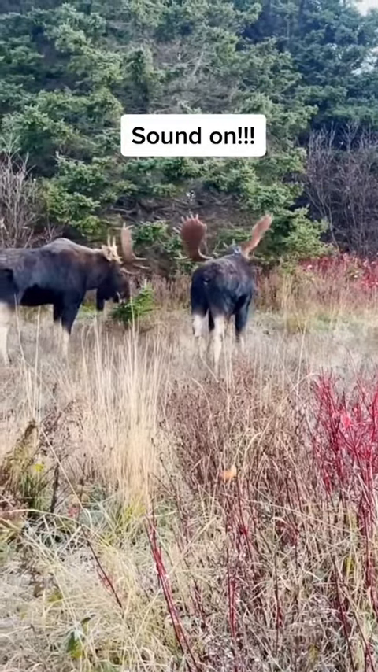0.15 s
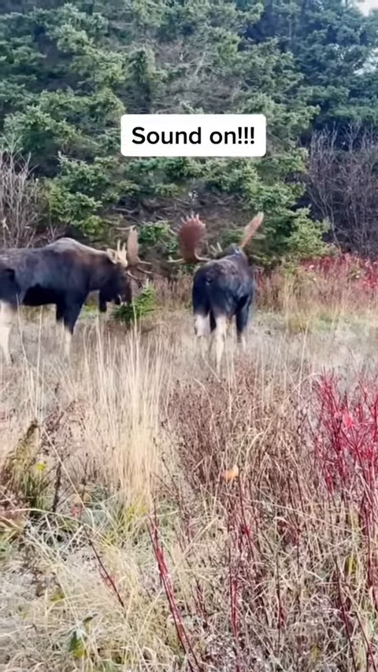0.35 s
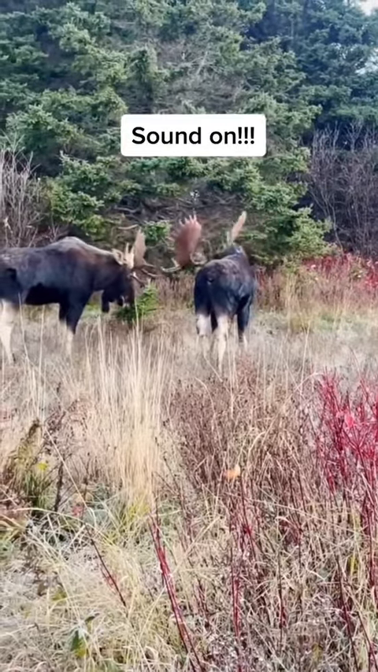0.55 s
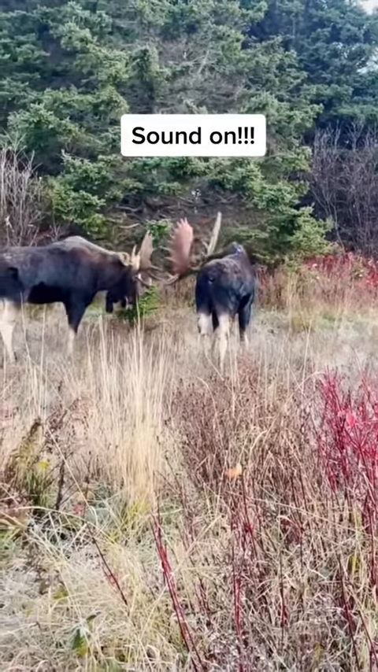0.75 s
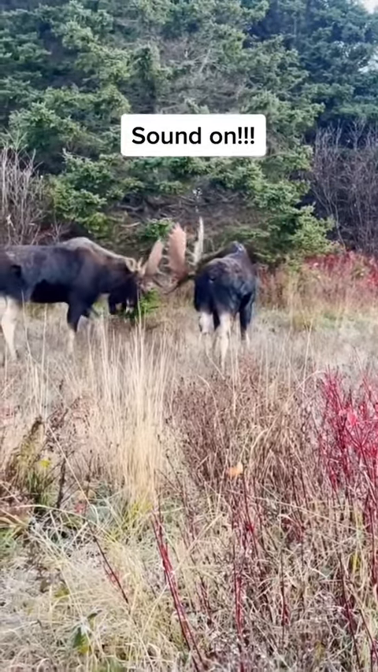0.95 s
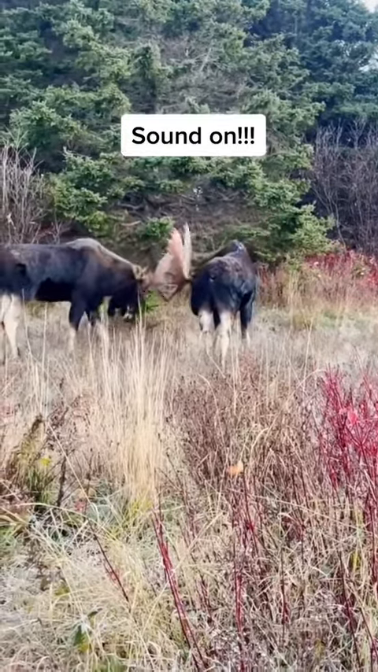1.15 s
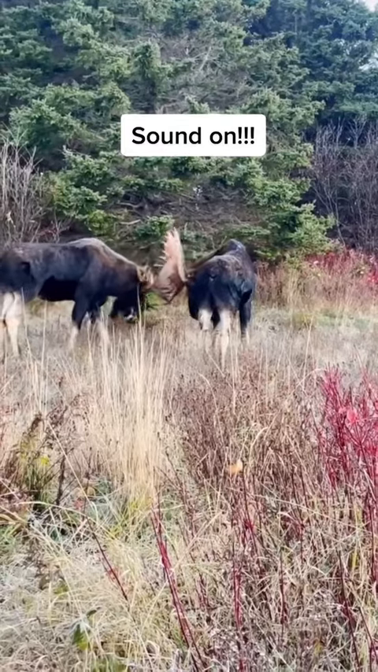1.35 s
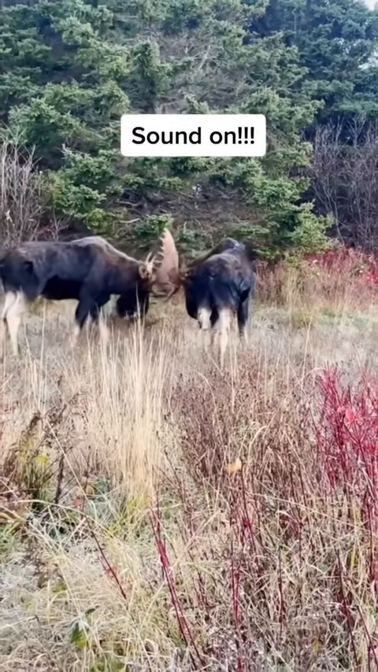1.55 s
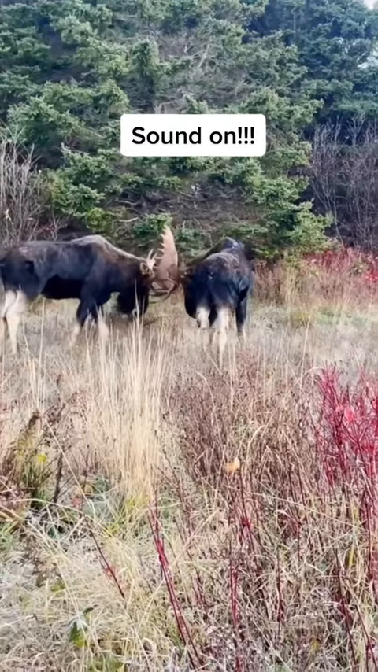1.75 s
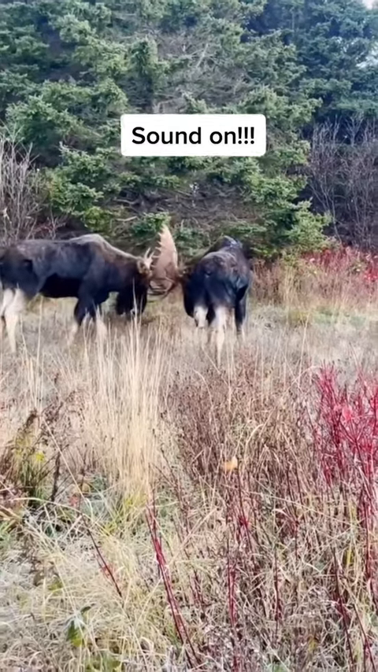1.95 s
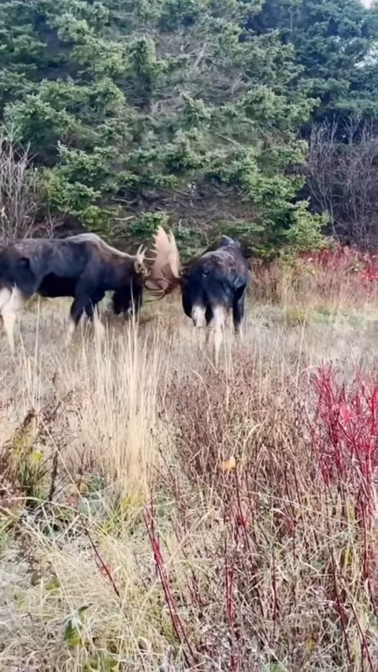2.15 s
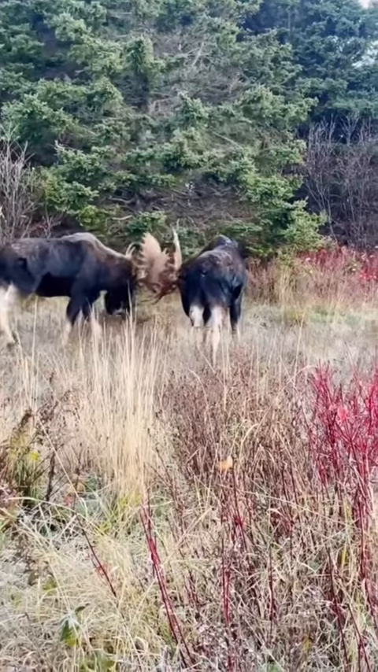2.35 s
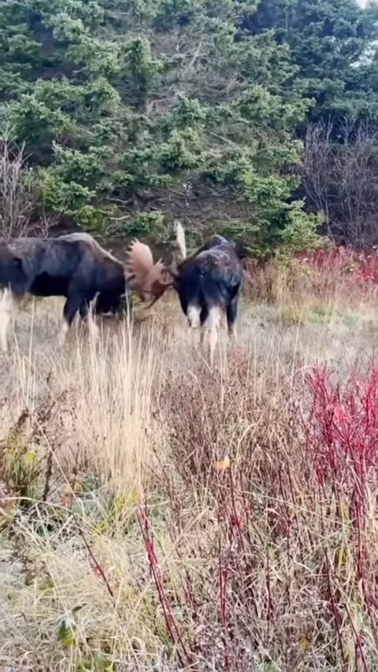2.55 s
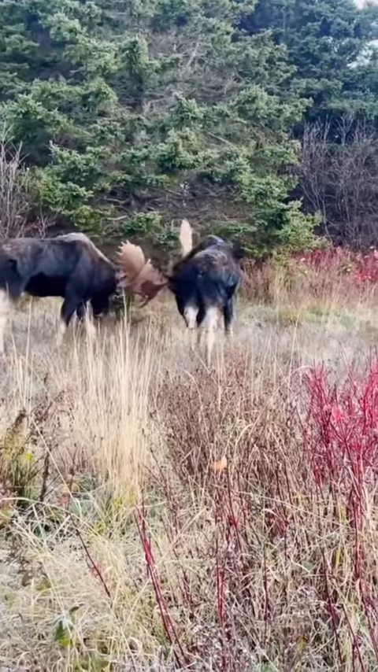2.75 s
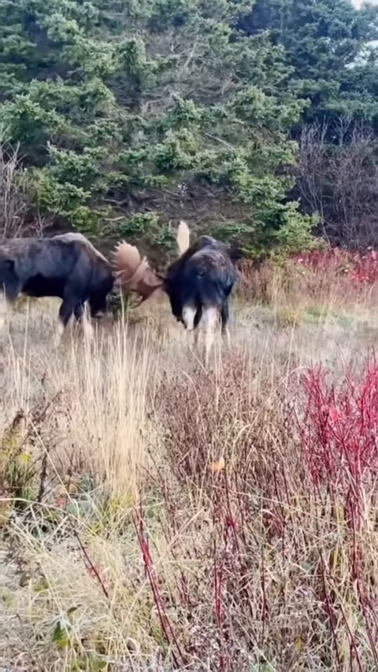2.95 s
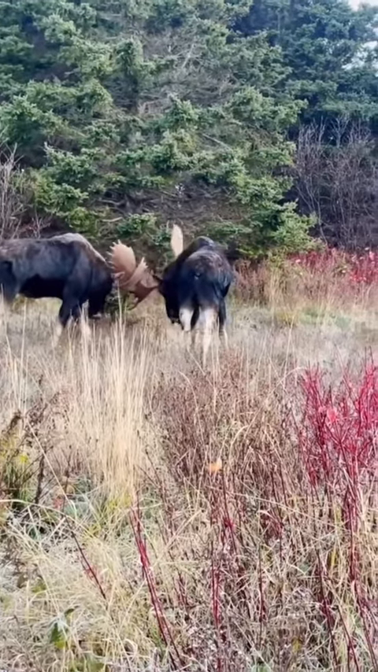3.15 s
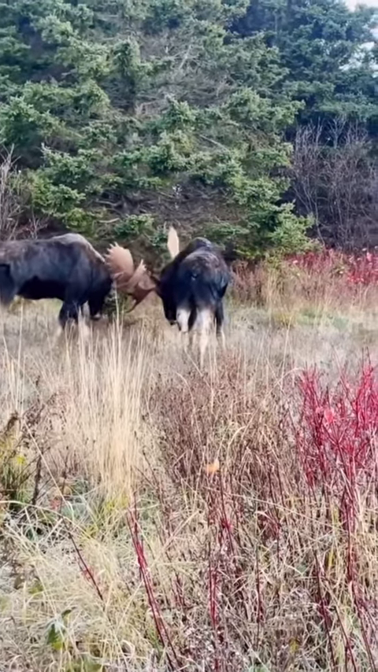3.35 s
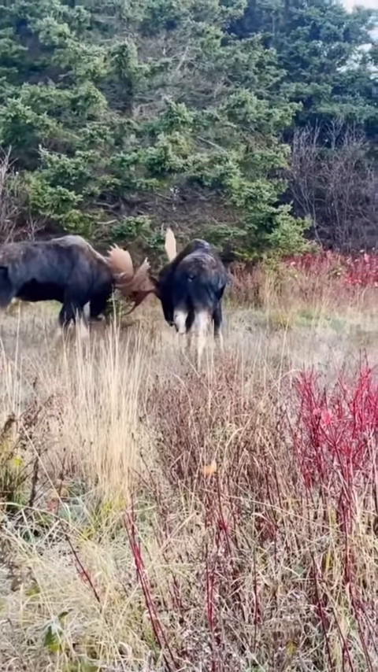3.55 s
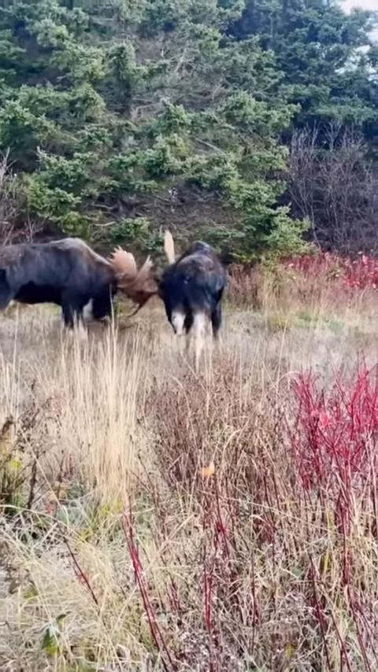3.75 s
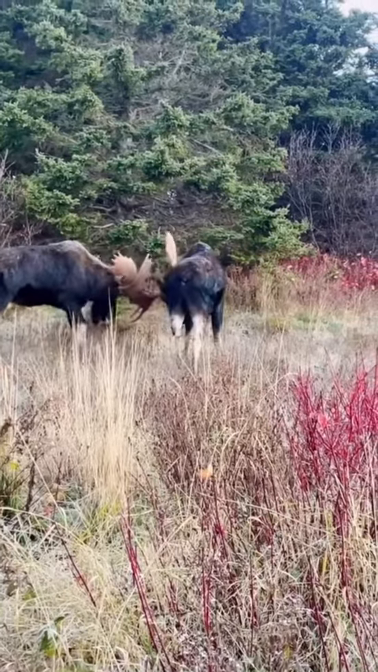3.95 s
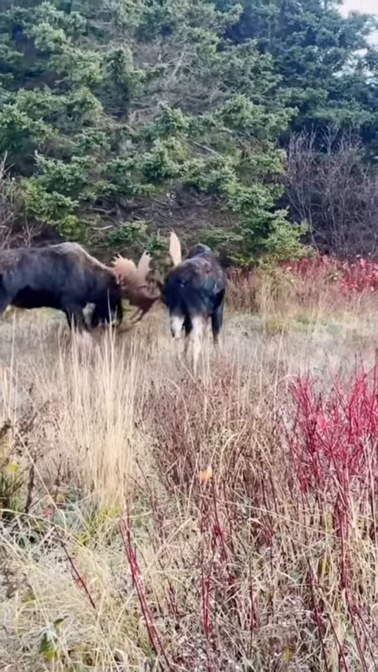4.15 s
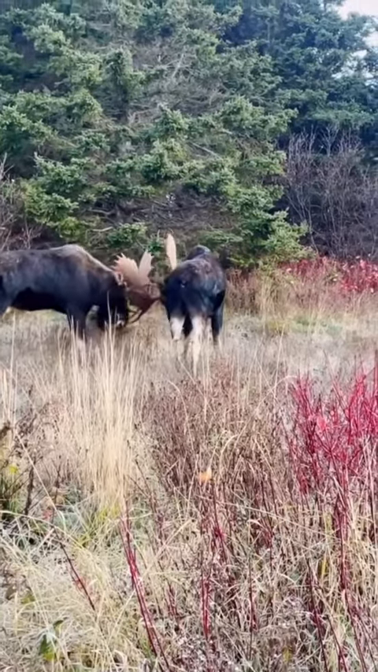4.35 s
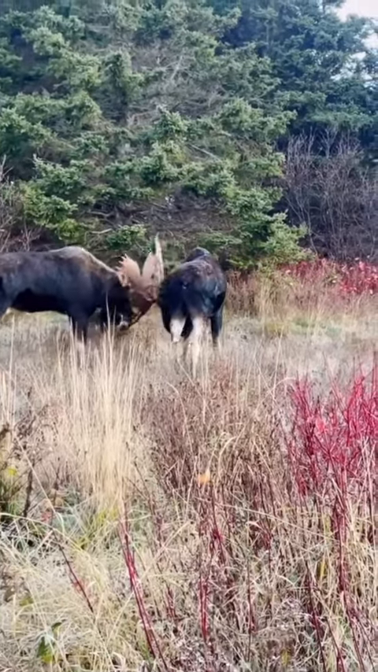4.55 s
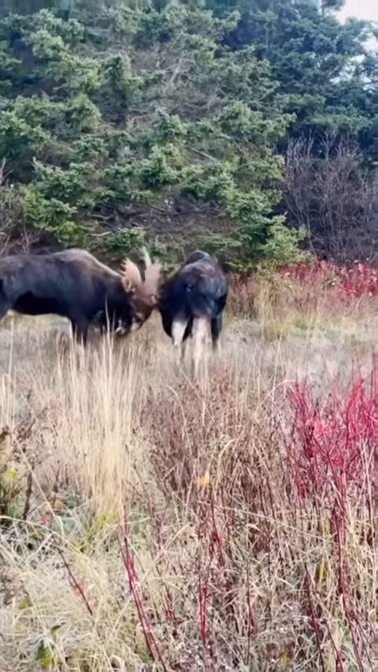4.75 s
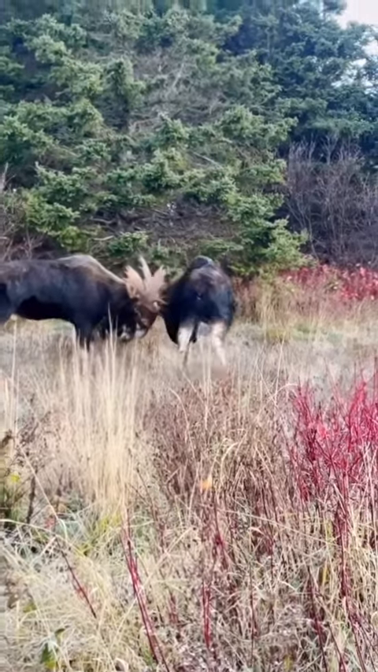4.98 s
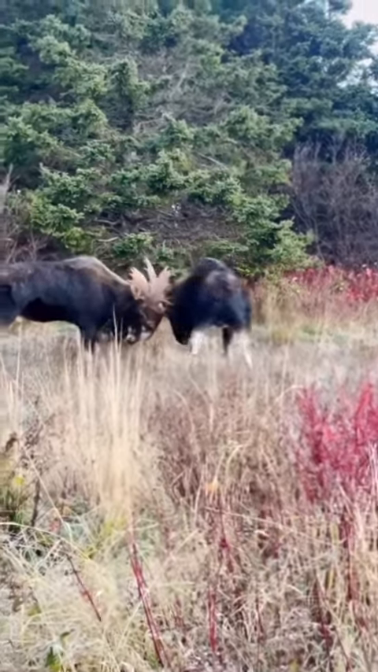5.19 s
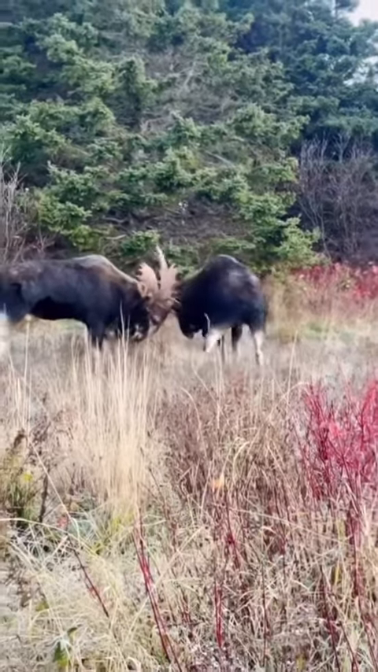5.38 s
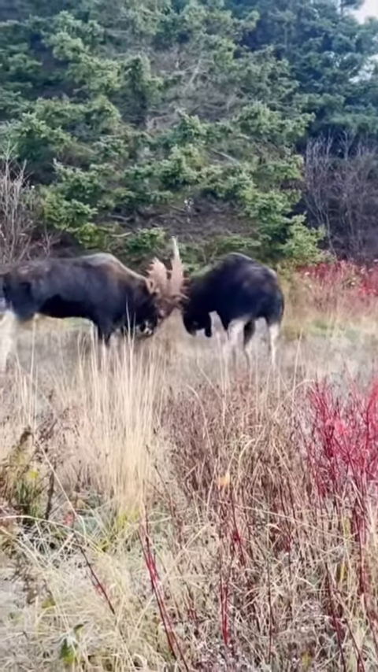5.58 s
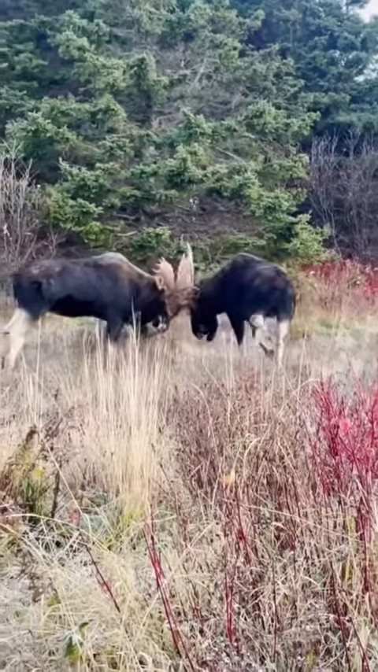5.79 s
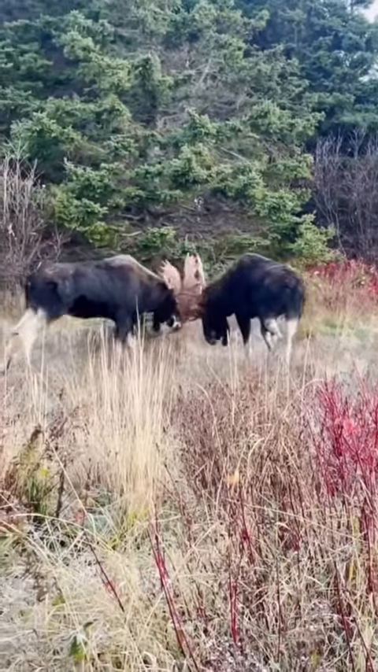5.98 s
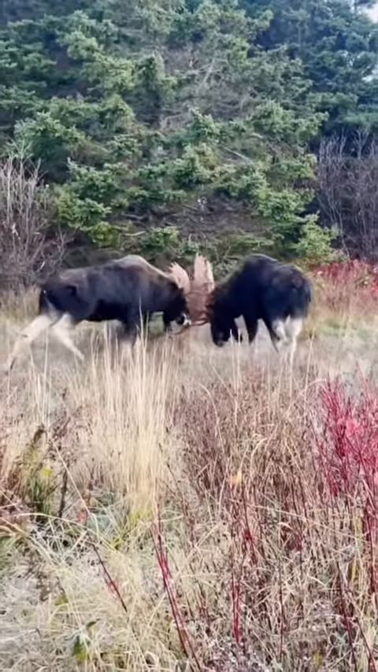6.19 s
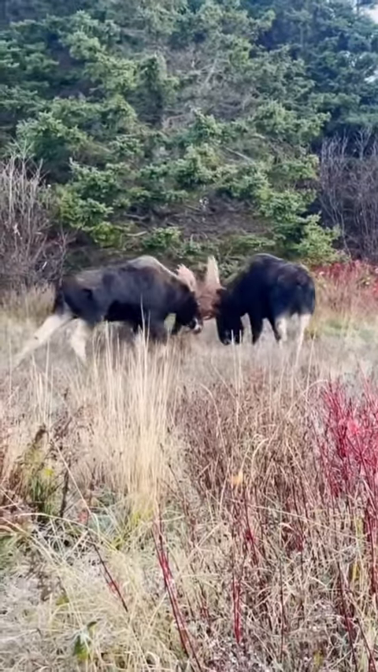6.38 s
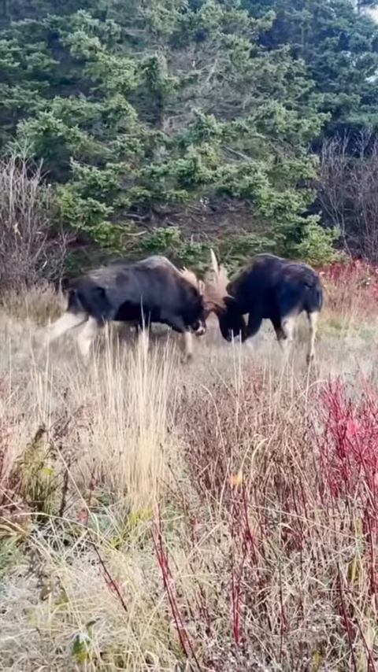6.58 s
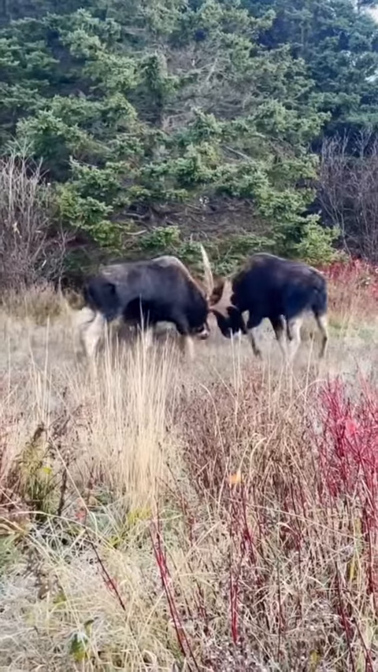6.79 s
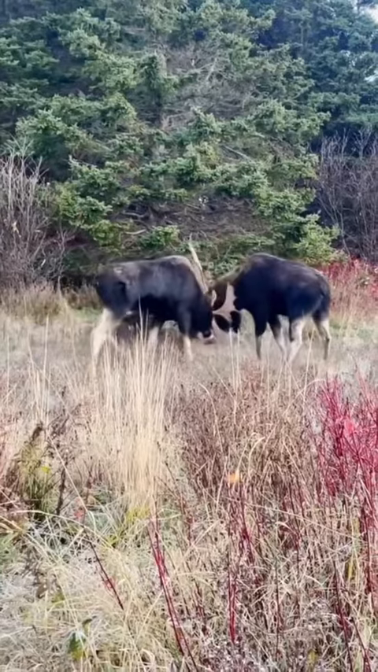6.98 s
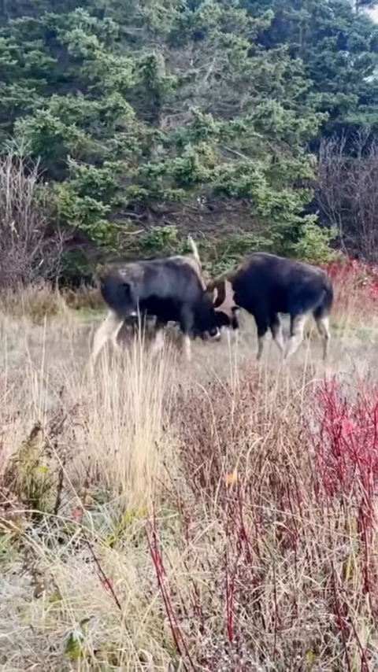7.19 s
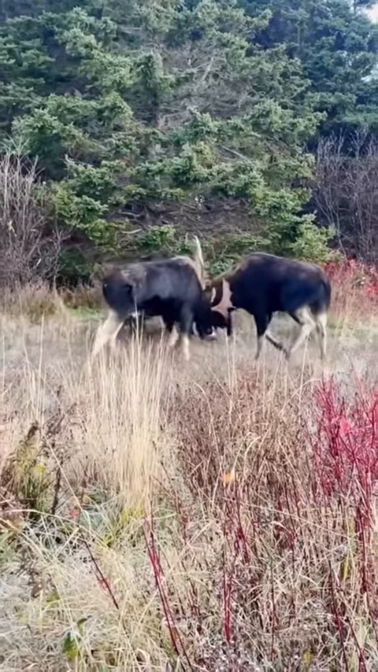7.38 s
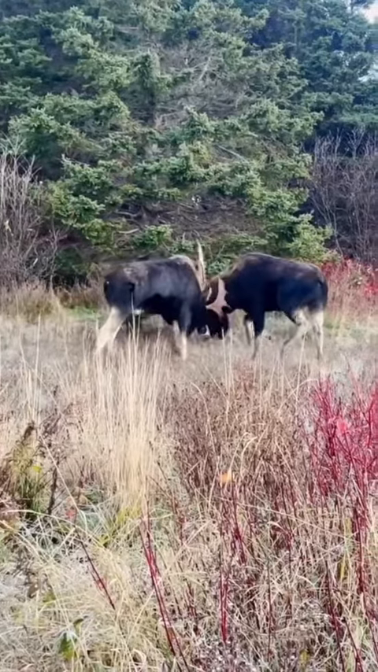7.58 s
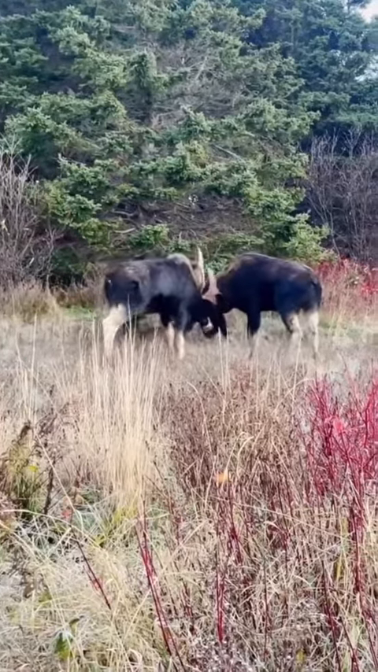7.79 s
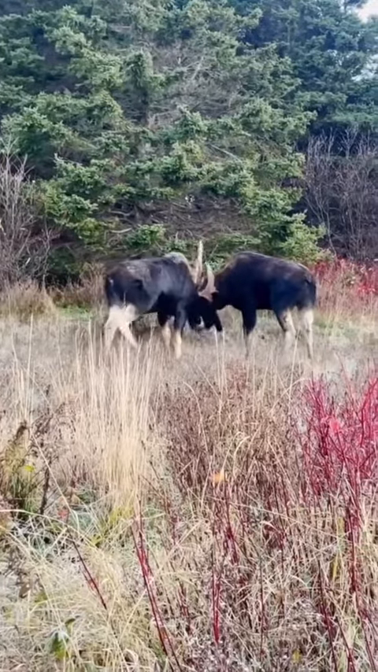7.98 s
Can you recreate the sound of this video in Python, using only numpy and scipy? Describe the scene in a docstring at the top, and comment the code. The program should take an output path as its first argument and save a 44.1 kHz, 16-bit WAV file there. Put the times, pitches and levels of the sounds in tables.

```python
"""Bull moose sparring

Two bull moose spar across a meadow, before a wall of spruce that scatters back a short echo.
Antler knocks are damped modes of palms and tines; grinding and juddering are trains of stick-slip jerks;
shoves thud as low damped tones. Close to the microphone a sleeve strokes, ticks and rustles as coloured
noise, over faint air and a low outdoor rumble."""
import sys
import numpy as np
from scipy import signal
from scipy.fft import rfft, irfft, next_fast_len
from scipy.io import wavfile
from scipy.ndimage import uniform_filter1d

SR = 44100
rng = np.random.default_rng(int(sys.argv[2]) if len(sys.argv) > 2 else 0)


def generate_wav(signal):
    """Clip the signal to [-1, 1] and save it as 16-bit WAV at the path in sys.argv[1]."""
    frames = np.transpose(np.atleast_2d(signal))
    scaled = np.clip(frames, -1, 1) * 32767
    pcm = np.round(scaled).astype(np.int16)
    wavfile.write(sys.argv[1], SR, pcm)


N = 354123
TIME = np.arange(N) / SR
BLOW = np.arange(SR // 5) / SR  # time axis of one short sound

# air and rumble spectra: f/Hz, gain/dB
AIR = [(100, -18.5), (250, -5), (500, 0), (900, -4.5), (1500, -9.5), (2500, -15), (4000, -25), (6500, -26),
       (8500, -31), (10500, -24.5), (12800, -21.5), (13600, -30), (15000, -36)]
RUMBLE_COLOUR = [(20, -36.5), (35, -7), (50, -9.5), (65, 4), (90, -3.5), (130, -7), (200, -16), (300, -19),
                 (600, -57.5)]
RUMBLE_DB, RUMBLE_SWELL_DB, RUMBLE_GUST_DB = -62.5, 0.73, -0.44

# left-right difference of diffuse sound: f/Hz, side level/dB before the caller's offset
SPREAD = [(60, -15), (150, -14), (400, -6.5), (900, -0.5), (4000, -4.5), (8000, -0.5), (12000, -8)]
# echo spectrum: f/Hz, gain/dB
ECHO = [(60, -6), (130, 2), (300, 0.5), (700, -8), (1500, -5.5), (3000, 5), (8000, 0)]

# sleeve hiss and rub spectra: f/Hz, gain/dB
HISS = [(5000, -40), (7300, -5.5), (8400, -15.5), (9000, -11), (9500, 0.5), (11000, 4), (12900, 4),
        (13400, -1.5), (14300, -5), (14800, -21), (16000, -7)]
RUB = [(300, 2), (900, 1), (1800, 2.5), (2500, 0), (3500, 5.5), (5200, -0.5), (6600, 1), (7500, -2.5),
       (8400, -30), (12000, -42)]
# sleeve strokes: t of fastest motion/s, hiss/dB, rub/dB (both before trim), swell/s, fall/s
STROKES = [(0.01, -69, -69.5, 0.091, 0.13), (.38, -80.5, -84.5, 0.47, 0.11), (.78, -72.5, -74, 0.1, 0.28),
           (1.011, -58, -65.5, 0.11, 0.17), (1.23, -80.5, -75.5, 0.3, 0.39),
           (2.591, -69.5, -70, 0.15, 0.088), (3.78, -75, -73.5, 0.069, 0.46),
           (3.97, -63.5, -72.5, 0.37, 0.26), (4.27, -70, -67.5, 0.12, 0.079),
           (4.44, -69, -67.5, 0.22, 0.056), (4.648, -73, -93, 0.023, 0.02), (6.3, -70, -69.5, 0.079, 0.12)]
STROKE_DEPTH_DB = 17.5  # drop at the ends of swell and fall
# long rustle of the moving arm: t/s, level/dB before the offsets below
RUSTLE = [(4.78, -87), (4.86, -69.5), (5.18, -66), (5.27, -73), (5.31, -65), (5.36, -73.5), (5.56, -73.5),
          (5.65, -66), (5.74, -71), (5.93, -71.5), (5.99, -77.5), (6.32, -74), (6.46, -77), (6.57, -70),
          (6.76, -69), (6.8, -65.5), (6.99, -76), (7.32, -71.5), (7.39, -77.5), (7.66, -69), (7.87, -83),
          (8.02, -72.5)]
# the cloth presses ever more lightly, so the hiss gains on the rub
RUSTLE_HISS_DB, RUSTLE_RUB_DB, HISS_GAIN_DB_PER_S = 3.5, 3.5, 1.4
# parts of the rub that swell on their own as folds shift: f/Hz, width/octaves
FOLDS = [(3400, 0.17), (5800, 0.42)]
# sleeve breaks loose and drags: start/s, length/s, level/dB
DRAGS = [(0.698, 0.24, -75.5), (.975, .06, -74)]
# drag spectrum: f/Hz, gain/dB
DRAG_COLOUR = [(500, -10), (2000, -2), (4000, -14), (5200, 5), (6700, -3), (8500, -3), (12000, -10),
               (15000, -21)]
# sleeve catches: t/s, level of the snap/dB
TICKS = [(.998, -85), (4.257, -69), (4.27, -71), (4.994, -50), (5.297, -81), (5.496, -66), (6.54, -65),
         (6.832, -73), (7.538, -68), (7.966, -67)]

# shoves thudding through skull and neck: t/s, level/dB before trim, f/Hz, t60 of the rocking/s
THUDS = [(1.483, -46, 149, 0.078), (1.621, -37.5, 118, 0.042), (1.646, -44, 110, 0.047),
         (2.489, -47, 84.5, 0.075), (2.642, -41.5, 104.5, 0.15), (3.133, -49, 155, 0.085),
         (3.207, -54.5, 80, 0.18), (3.602, -41.5, 96, 0.22), (4.242, -47.5, 71, 0.19),
         (4.348, -33.5, 230, 0.04), (4.485, -39.5, 91, 0.22), (4.541, -38, 163, 0.075),
         (4.575, -34.5, 129.4, 0.11), (4.603, -42, 107.4, 0.11), (7.096, -34.5, 182, 0.051),
         (7.126, -33, 169, 0.052), (7.181, -48, 73, 0.11), (7.757, -47.5, 190, 0.11)]

# flat palms sliding over each other: start/s, length/s, attack/s, level/dB
RUBS = [(1.612, 0.044, 0.011, -54), (2.368, 0.057, 0.03, -58.5), (2.548, 0.095, 0.089, -53.5)]
# hollow rub spectrum: f/Hz, gain/dB
HOLLOW = [(80, -22.5), (170, -3.5), (300, 0.5), (390, -3.5), (490, 3.5), (650, -5.5), (1000, -11.5),
          (1400, -17), (4000, -56)]

# tine skidding across a palm: start/s, length/s, starting level of the palm/dB
SKIDS = [(4.03, 0.21, -40), (4.184, 0.043, -45.5)]
SKID_ATTACK_S, SKID_SAG_DB_PER_S, SKID_RELEASE_T60_S = 0.011, 94, 0.14
# nominal slip rate, sliding from start to end value
SLIP_START_HZ, SLIP_END_HZ, SLIP_SETTLE_S = 192.6, 111.2, .04

# pushes with locked antlers: start/s, length/s, attack/s, palm/dB, low strain/dB, grit/dB (before trim)
PUSHES = [(1.222, 0.18, 0.01, -66.5, -64.5, -80), (1.389, 0.15, 0.011, -60, -50.5, -88),
          (1.61, 0.067, .012, -60, -50.5, -65), (2.123, 0.28, 0.088, -68.5, -64.5, -84),
          (2.364, 0.064, .012, -65, -54, -80), (2.49, 0.17, 0.011, -71, -57, -104),
          (2.558, 0.093, 0.042, -55, -50, -85), (2.77, 0.077, 0.031, -70, -62, -79),
          (2.926, 0.19, .09, -67.5, -64.5, -89), (3.451, 0.12, 0.032, -68, -79, -120),
          (4.082, 0.16, 0.015, -74, -51, -73), (4.336, 0.14, 0.014, -51, -45, -68),
          (4.553, 0.08, .012, -75, -70, -71.5), (6.382, 0.28, 0.051, -71.5, -60.5, -90),
          (6.71, 0.21, 0.013, -81, -63.5, -99), (7.062, 0.1, 0.011, -60, -53, -75),
          (7.59, 0.17, .012, -74, -58.5, -82), (7.731, 0.047, 0.01, -60, -52.5, -77)]
PUSH_RELEASE_T60_S = 0.24
# spectrum of the ground under straining hooves: f/Hz, gain/dB
GROUND = [(32, -36), (60, 3.5), (90, -3.5), (160, -32), (400, -62)]

# hard, dry tip strikes: t/s, level/dB before rebound and halving, f/Hz
SNAPS = [(1.374, -46, 3020), (1.476, -42.5, 2260), (1.475, -46, 3450), (1.61, -38, 2530),
         (4.343, -43, 2650), (4.462, -41.5, 3350), (7.094, -60, 3400), (7.123, -70, 3000),
         (7.784, -58, 3100), (7.965, -59.5, 3020)]
# chatter of a landing tip: delay/s, level/dB
REBOUNDS = [(0, -2.5), (.0017, 0.5), (.0042, -8)]

# antler knocks: t/s, level/dB before trim, clack centre f/Hz, tine brightness/dB before trim,
# t60 under contact/s, width of the excited palm band/octaves before limiting
KNOCKS = [(1.218, -44.5, 910, -1.5, 0.19, 4.8), (1.234, -48.5, 785, -19, 0.13, 2.5),
          (1.247, -53, 870, -25, .08, 2), (1.373, -38, 1590, -6.5, 0.081, 0.44),
          (1.377, -33, 663, -35, 0.066, 1.8), (1.415, -40, 746, -17, 0.062, 4.7),
          (1.437, -48, 596, -18, .07, 3.3), (1.476, -38, 1020, -3.5, 0.053, 1.25),
          (1.481, -47, 595, -8, .04, 1.7), (1.526, -47.5, 1190, -9, 0.058, 3.4),
          (1.545, -47.5, 930, -15, 0.088, 2.2), (1.606, -35, 1170, -7, 0.21, 3.1),
          (1.61, -30, 860, -10.5, 0.055, 4.4), (1.617, -31, 850, -25, 0.022, 0.47),
          (1.623, -36, 894, -28, 0.094, 0.79), (1.653, -56, 805, 1.5, .05, 2.8),
          (1.667, -47, 840, -4, 0.03, 2.7), (1.678, -54, 960, -6.5, 0.038, 2.6),
          (2.253, -59, 870, -16, 0.053, 2.7), (2.315, -47, 844, -16, 0.11, 2.8),
          (2.35, -61, 890, -10, 0.056, 2.5), (2.407, -60, 700, -8, 0.098, 2.2),
          (2.485, -43.5, 530, -28, 0.087, 0.92), (2.629, -26.5, 780, -27, 0.042, 1.5),
          (2.64, -24.5, 794, -19.5, 0.021, 2.15), (2.645, -37.5, 906, -18, 0.07, 3),
          (2.652, -37.5, 567, -22, 0.044, 2.9), (2.684, -35, 760, -24, 0.031, 1.8),
          (2.721, -54, 750, -9, 0.023, 1.7), (2.738, -46.5, 696, -17, 0.03, 2.3),
          (2.752, -54, 740, -11, 0.026, 1.2), (2.772, -55.5, 705, -30, 0.03, 1.3),
          (2.801, -54, 844, -15.5, .06, 1.5), (2.815, -50.5, 646, -36, 0.075, 1.7),
          (2.828, -53, 675, -17, 0.055, 0.64), (2.847, -49.5, 667, -22, 0.09, 0.5),
          (2.856, -47, 730, -28, 0.057, 0.41), (2.865, -46.5, 588, -22, 0.035, 0.57),
          (3.011, -54.5, 613, -23, 0.24, 0.43), (3.035, -65, 760, -18, 0.092, 1.2),
          (3.062, -47.5, 740, -31.5, 0.029, 0.72), (3.126, -48.5, 900, -18.5, 0.073, 1.4),
          (3.515, -50, 774, -26, 0.06, 0.78), (3.593, -41.5, 697, -18, 0.087, 4.5),
          (3.892, -58, 1615, -6, 0.084, 2.4), (4.035, -36.5, 803, -24, 0.21, 1.1),
          (4.079, -56, 664, -5, 0.11, 2.6), (4.209, -38.5, 685, -35, 0.05, 2),
          (4.24, -44.5, 700, -24, 0.051, 1.1), (4.345, -34.5, 864, -10, 0.041, 5.5),
          (4.35, -37, 524, -39, 0.25, 4), (4.391, -42.5, 703, -27, 0.096, 0.89),
          (4.462, -36.5, 1010, -4, 0.052, 1), (4.466, -36.5, 856, -22, 0.056, 0.78),
          (4.534, -34, 657, -17.5, 0.075, 1.3), (4.556, -30.5, 987, -19, 0.088, 5.2),
          (4.786, -41.5, 970, -21.5, 0.039, 2.7), (5.322, -58.5, 980, -4.5, 0.12, 1),
          (5.416, -61.5, 950, -5.5, 0.095, 1.4), (5.539, -60, 695, -18, 0.089, 0.36),
          (6.022, -56.5, 810, -31, 0.087, 4.6), (6.045, -60, 1020, -23, 0.079, 1.2),
          (6.191, -54, 810, -17, 0.14, 2.1), (7.079, -46, 933, -10, 0.14, 4.4),
          (7.094, -39, 667, -16, 0.087, 1.9), (7.102, -39.5, 1066, -20, 0.2, 0.43),
          (7.122, -45, 530, -13, 0.031, 4.6), (7.61, -44.5, 820, -20, 0.062, 4.5),
          (7.749, -53.5, 820, -20, 0.044, 4.5), (7.784, -46.5, 1150, -9, 0.055, 1.6),
          (7.967, -61, 1010, -9, 0.11, 1.5)]
# modes of the broad palms and of the tines: f/Hz, level/dB, free t60/s
PALM = [(291, -6.5, 0.065), (437, -2.5, 0.21), (524, 0, 0.23), (606, 1, 0.43), (679, 0, 0.38),
        (771.4, 1, 0.77), (869, -0.5, 0.16), (973.5, -3, 0.37), (1026, -3.5, 0.13), (1181, -4.5, 0.079),
        (1370, 0.5, 0.073), (1588, -3.5, 0.06)]
TINES = [(1558, 8.5, 0.052), (1804, 7.5, 0.05), (1892, 7, 0.063), (2290, -0.5, 0.056), (2510, -12, 0.055),
         (2880, 1.5, 0.056), (3114, -2.5, 0.048), (3420, -0.5, 0.018), (3700, -24.5, 0.022),
         (3970, -23, 0.023), (5130, -3.5, 0.02)]
# crack of bone on bone: f/Hz, gain/dB
CRACK = [(800, 6), (1700, 11.5), (3500, 8), (5000, -4), (7000, -13), (14000, -28)]
# the highs of a clack run faster through bone: pitch falls to END from END + CHIRP (shares of centre)
CLACK_END, CLACK_CHIRP, CLACK_SETTLE_S = .87, 0.45, 0.0027
# each blow lands on another spot: scatter of mode levels, and of pitch (share)
SPOT_SCATTER_DB, TINE_SPREAD, PALM_SPREAD = 3, .06, .025
TINE_MAX_T60_S = 0.054  # limit on the damping envelope of the thin tines
# soft tine touches lose their top: dB above 3 kHz per dB under a hard blow, with a limit
HARD_TINE_DB, SOFT_LOSS_DB_PER_DB, SOFT_LIMIT_DB = -32.5, 1, -7
# low tone of the main beam, too heavy to follow blows harder than a medium knock
BEAM_HZ, BEAM_DB, BEAM_T60_S, BEAM_LAG_DB_PER_DB = 207, -15, 0.055, 0.54
# glancing touches throw more of their sound toward the trees
MEDIUM_KNOCK_DB, KNOCK_ECHO_DB, GLANCE_ECHO_DB_PER_DB = -40, -6, .2

TOP_HZ = 15600


def undb(db):
    """Decibels to gain."""
    return 10 ** (np.asarray(db) / 20)


def unit(x):
    """Scale to rms 1."""
    return x / np.sqrt(np.mean(x ** 2))


def unit_peak(x):
    """Scale so that the loudest 7 ms have rms 1."""
    return x / np.sqrt(uniform_filter1d(x ** 2, size=300, mode="constant").max())


def decay(t, t60_s):
    """Exponential fall of 60 dB in t60_s."""
    return np.exp(-np.log(1000) * t / t60_s)


def fade(t60_s, rise_s=1e-4):
    """Envelope of a blow: smooth quick rise, exponential decay."""
    return (1 - np.exp(-BLOW / rise_s)) ** 2 * decay(BLOW, max(t60_s, 1e-3))


def held(start_s, length_s, attack_s, t60_s):
    """Envelope of a sustained contact: attack, hold, release."""
    rise = np.clip((TIME - start_s) / max(attack_s, 1e-3), 0, 1)
    return rise * decay(np.maximum(TIME - start_s - length_s, 0), max(t60_s, 1e-3))


def stroke(s, swell_s, fall_s):
    """Envelope of a movement that speeds up until s and slows again, linear in dB."""
    away = np.maximum((s - TIME) / max(swell_s, 1e-3), (TIME - s) / max(fall_s, 1e-3))
    return undb(-STROKE_DEPTH_DB * away)


def follow(rows):
    """Gain along a level curve, silent before it starts."""
    return undb(np.interp(TIME, *np.transpose(rows), left=-np.inf))


def add(track, s, sound):
    """Mix a sound into a track at time s."""
    i = int(s * SR)
    track[i:i + len(sound)] += sound[:N - i]


def colour(x, points):
    """Filter by a (Hz, dB) spectrum, interpolated over log frequency."""
    hz, db = np.transpose(points)
    n = next_fast_len(x.shape[-1])
    gain = undb(np.interp(np.log(np.fft.rfftfreq(n, 1 / SR) + 1), np.log(hz), db))
    return irfft(rfft(x, n) * gain, n)[..., :x.shape[-1]]


def band(x, hz, octaves):
    """Band-pass: a contact favours frequencies near its own."""
    edges_hz = hz * 2 ** (np.array([-.5, .5]) * np.clip(octaves, .2, 4))
    return signal.sosfilt(signal.butter(2, edges_hz, "bandpass", fs=SR, output="sos"), x)


def walk(rate_hz):
    """Smoothed random steps, rms 1."""
    k = int(SR / rate_hz)
    steps = np.repeat(rng.standard_normal(N // k + 1), k)
    return unit(uniform_filter1d(steps, k)[:N])


def burst_noise():
    """White noise as long as one blow."""
    return rng.standard_normal(len(BLOW))


def tone(hz):
    """Steady sine as long as one blow."""
    return np.sin(2 * np.pi * hz * BLOW)


def chirp(hz):
    """Tone that sinks quickly through its centre pitch."""
    pitch_hz = hz * (CLACK_END + CLACK_CHIRP * np.exp(-BLOW / CLACK_SETTLE_S))
    return np.sin(2 * np.pi * np.cumsum(pitch_hz) / SR)


def wide(side_db, count=N):
    """Diffuse stereo noise: alike in the bass, wider above."""
    mid, side = rng.standard_normal((2, count))
    return mid + undb(side_db) * colour(side, SPREAD) * np.array([[1], [-1]])


def slips(rate_hz, jitter, scatter_db):
    """Stick-slip: jerks uneven in spacing and size; the nominal rate may move."""
    gap, size = rng.standard_normal((4000, 2)).T
    travel = np.cumsum(np.broadcast_to(rate_hz, N)) / SR
    at = np.searchsorted(travel, np.cumsum(np.exp(jitter * gap)))
    inside = at < N
    return np.bincount(at[inside], undb(scatter_db * size)[inside], N)


def ring(modes, detune=0.01, spread=0):
    """Damped modes struck at a chance spot, each detuned by the load; spread shifts all together."""
    hz, db, t60_s = np.transpose(modes)[:, :, None]
    hz = hz * (1 + detune * rng.standard_normal(hz.shape) + spread * rng.standard_normal())
    db = db + SPOT_SCATTER_DB * rng.standard_normal(hz.shape)
    phase = rng.uniform(0, 2 * np.pi, hz.shape)
    return np.sum(undb(db) * decay(BLOW, t60_s) * np.sin(2 * np.pi * hz * BLOW + phase), axis=0)


def meadow(air_db=-74, waver_db=-0.3):
    """Outdoor air noise with wavering treble, over a low, gently swelling rumble."""
    air = unit(colour(wide(0), AIR)) * undb(air_db + .6 * walk(3))
    treble = colour(air, [(4000, -40), (9000, 0)])
    air = air + treble * (undb(waver_db * walk(13.0)) - 1)
    rumble_db = RUMBLE_DB + RUMBLE_SWELL_DB * walk(2.7) + RUMBLE_GUST_DB * walk(18)
    return air + unit(colour(wide(0.31), RUMBLE_COLOUR)) * undb(rumble_db)


def forest(x, low_t60_s=0.4, treble_t60_s=0.49, side_db=0, patchy_db=3, trunks_db=6):
    """Trunks and branches return a patchy cloud of reflections, its treble decaying slightly slower."""
    t = TIME[:SR // 2]
    sizes = undb(patchy_db * walk(150) + trunks_db * np.tanh(walk(1500)))[:len(t)]
    taps = wide(side_db, count=len(t)) * sizes * (1 - np.exp(-t / 0.00061))
    low = colour(taps, [(900, -5.0), (2000, -60.0), (5000, -42.0)])
    cloud = low * decay(t, low_t60_s) + (taps - low) * decay(t, treble_t60_s)
    cloud = cloud / np.sqrt(np.sum(cloud ** 2) / 2)
    return signal.oaconvolve(colour(x, ECHO)[None], cloud, axes=1)[:, :N]


def brush(x, side_db=-11, t60_s=0.074):
    """Stalks near the microphone scatter sound a little differently to left and right."""
    scatter = burst_noise() * fade(t60_s, rise_s=0.0026)
    side = colour(signal.oaconvolve(x, scatter / np.linalg.norm(scatter))[:N], SPREAD)
    return x + undb(side_db) * side * np.array([[1], [-1]])


def shifting(x, depth=0.18):
    """The colour of a rub wanders as the cloth folds."""
    return x + sum(depth * walk(5) * band(x, hz, octaves) for hz, octaves in FOLDS)


def sleeve(hiss_trim_db=-1, rub_trim_db=2, grain_db=-0.5, flutter_db=1.53, snag_db=-0.24):
    """Cloth slides near the microphone, in strokes and then a long rustle: grainy hiss over a lower rub."""
    threads = undb(grain_db * walk(600) + flutter_db * walk(45))
    moving = follow(RUSTLE)
    hiss_gain = moving * undb(RUSTLE_HISS_DB + HISS_GAIN_DB_PER_S * (TIME - RUSTLE[0][0]))
    rub_gain = moving * undb(RUSTLE_RUB_DB)
    for s, hiss_db, rub_db, swell_s, fall_s in STROKES:
        motion = stroke(s, swell_s, fall_s)
        hiss_gain = np.hypot(hiss_gain, undb(hiss_db) * motion)
        rub_gain = np.hypot(rub_gain, undb(rub_db) * motion)
    hiss = undb(hiss_trim_db + snag_db * walk(22)) * hiss_gain * unit(colour(wide(-0.86), HISS))
    rub = undb(rub_trim_db) * rub_gain * unit(shifting(colour(wide(-1.5), RUB)))
    return threads * (hiss + rub)


def creases():
    """Small folds give way at uneven moments, each with a short burst: roughness of cloth."""
    bursts = signal.oaconvolve(slips(170, .9, 4), fade(.02))[:N]
    return unit(np.sqrt(.5 + unit(np.abs(bursts))))


def drags(attack_s=.004, release_t60_s=0.79):
    """Stuck cloth starts to slide all at once, rasping thread over thread."""
    motion = sum(undb(db) * held(s, length_s, attack_s, release_t60_s) for s, length_s, db in DRAGS)
    return motion * unit(colour(wide(-1.7) * creases(), DRAG_COLOUR))


def ticks(bump_db=-6, bump_hz=150, tap_db=-2, tap_hz=520):
    """Cloth catches and lets go: a sharp noise tick, a tap and a small bump in the housing."""
    out = np.zeros(N)
    snap_colour = [(200, 9), (1100, 6.0), (2500, -3.0), (6000, -1), (10000, 4.5), (15000, -10)]
    for s, db in TICKS:
        snap = unit_peak(colour(burst_noise(), snap_colour) * fade(0.031, rise_s=0.00016))
        tap = unit_peak(chirp(tap_hz) * fade(0.015, rise_s=0.0013))
        bump = unit_peak(tone(bump_hz) * fade(0.092, rise_s=0.0029))
        add(out, s, undb(db) * (snap + undb(tap_db) * tap + undb(bump_db) * bump))
    return out


def thuds(trim_db=-2, flex_db=-7, twist_db=-9):
    """The rack rocks on the skull, and flexes and twists higher up, damped by the neck."""
    out = np.zeros(N)
    for s, db, hz, t60_s in THUDS:
        rock = tone(hz) * fade(t60_s, rise_s=0.0044)
        flex = tone(1.856 * hz) * fade(0.5 * t60_s, rise_s=0.0012)
        twist = tone(2.39 * hz) * fade(0.33 * t60_s, rise_s=0.0017)
        thud = unit_peak(rock + undb(flex_db) * flex + undb(twist_db) * twist)
        add(out, s, undb(db + trim_db) * thud)
    return out


def rubs(release_t60_s=0.15):
    """Broad faces of bone slide in dense, soft slips: a mostly low, hollow rub."""
    pressure = sum(undb(db) * held(s, length_s, attack_s, release_t60_s)
                   for s, length_s, attack_s, db in RUBS)
    return pressure * unit(colour(slips(420, .7, 1.3), HOLLOW))


def judder(centre_hz=660, octaves=0.89, strain_db=-7, rasp_db=-19):
    """A tine skips over a palm in uneven slips whose rate falls from the first skid on: a hollow creak."""
    since_s = np.maximum(TIME - SKIDS[0][0], 0)
    rate_hz = SLIP_END_HZ + (SLIP_START_HZ - SLIP_END_HZ) * np.exp(-since_s / SLIP_SETTLE_S)
    jerks = slips(rate_hz, 0.18, 2.5)
    palm = signal.oaconvolve(jerks, band(ring(PALM) * fade(0.12, rise_s=0.0012), centre_hz, octaves))[:N]
    strain = colour(jerks, [(50, -28), (130, -19), (230, 19.0), (330, -2), (440, 18.5), (800, -32),
                            (3000, -74)])
    rasp = band(jerks, hz=1260, octaves=0.88)
    speed = np.zeros(N)
    for s, length_s, db in SKIDS:
        sag = undb(db - SKID_SAG_DB_PER_S * np.maximum(TIME - s, 0))
        speed += sag * held(s, length_s, SKID_ATTACK_S, SKID_RELEASE_T60_S)
    return speed * (unit(palm) + undb(strain_db) * unit(strain) + undb(rasp_db) * unit(rasp))


def grinding(palm_trim_db=1, grit_trim_db=0, strain_trim_db=-3, centre_hz=700, octaves=1.7, hoof_db=-9):
    """Ridged bone drags over bone: jerks crackle, ring the palms, strain the rack; hooves load the ground."""
    palms = np.zeros(N)
    for _ in range(3):  # contact points
        plate = unit(ring(PALM) * fade(0.077, rise_s=0.00064))
        palms += signal.oaconvolve(slips(45, .7, 0.85), plate)[:N]
    grit = colour(slips(130, 0.66, 3.5), [(700, -25.0), (1300, -14.0), (1700, 7.5), (2300, -6.5),
                                          (3500, -9), (5000, -35), (9000, -42.0)])
    strain = colour(slips(160, 0.84, 0.99), [(50, -28.0), (120, 9.0), (220, 0.0), (380, -5.5),
                                             (800, -22.5), (3000, -48.0)])
    hooves = unit(colour(rng.standard_normal(N), GROUND))
    drag, load, bite = np.zeros((3, N))
    for s, length_s, attack_s, palm_db, strain_db, grit_db in PUSHES:
        push = held(s, length_s, attack_s, PUSH_RELEASE_T60_S)
        drag = np.maximum(drag, undb(palm_db) * push)
        load = np.maximum(load, undb(strain_db) * push)
        bite = np.maximum(bite, undb(grit_db) * push)
    rasp = undb(palm_trim_db) * drag * unit(band(palms, centre_hz, octaves))
    crackle = undb(grit_trim_db) * bite * unit(grit)
    return rasp + crackle + load * (undb(strain_trim_db) * unit(strain) + undb(hoof_db) * hooves)


def snaps(octaves=0.78, t60_s=0.018):
    """Hard tips meet and rebound within milliseconds: a bright, woody snap that hardly rings."""
    out = np.zeros(N)
    for s, db, hz in SNAPS:
        for late_s, rebound_db in REBOUNDS:
            burst = burst_noise() * fade(t60_s)
            burst = band(band(burst, hz, octaves), hz, octaves)
            add(out, s + late_s, undb(db + rebound_db) * unit_peak(burst) / 2)
    return out


def knocks(clack_db=2, tine_trim_db=1, crack_db=-3, trim_db=-2):
    """A short clack, then palms and tines ring, damped by contact; returns direct and thrown sound."""
    direct, thrown = np.zeros((2, N))
    for s, db, hz, bright_db, t60_s, octaves in KNOCKS:
        clack = unit_peak(chirp(hz) * fade(0.35 * t60_s, rise_s=0.0011))
        palm = ring(PALM, spread=PALM_SPREAD) * fade(t60_s, rise_s=0.0024)
        palm = unit_peak(band(palm, hz, octaves))
        tine_fade = fade(min(t60_s / 2, TINE_MAX_T60_S), rise_s=0.0027)
        tines = unit_peak(ring(TINES, detune=0.019, spread=TINE_SPREAD) * tine_fade)
        crack = unit_peak(colour(burst_noise(), CRACK) * fade(0.037, rise_s=0.00039))
        beam_hz = BEAM_HZ * np.exp(0.19 * rng.standard_normal())
        beam = unit_peak(tone(beam_hz) * fade(BEAM_T60_S, rise_s=0.0018))
        beam_db = BEAM_DB - BEAM_LAG_DB_PER_DB * max(db - MEDIUM_KNOCK_DB, 0)
        body = unit_peak(palm + undb(clack_db) * clack) + undb(beam_db) * beam
        top_db = np.clip(SOFT_LOSS_DB_PER_DB * (db + bright_db - HARD_TINE_DB), SOFT_LIMIT_DB, 2)
        edge = colour(tines + undb(crack_db) * crack, [(1900, 0.0056), (3000, top_db), (6000, top_db)])
        knock = undb(db + trim_db) * (body + undb(bright_db + tine_trim_db) * unit_peak(edge))
        add(direct, s, knock)
        # tilted palms throw part of the sound toward the trees
        thrown_db = KNOCK_ECHO_DB + GLANCE_ECHO_DB_PER_DB * (MEDIUM_KNOCK_DB - db)
        add(thrown, s, undb(thrown_db) * knock)
    return direct, thrown


def scene(shove_echo_db=-9):
    """Antlers straight ahead, their echo, and the sounds around the microphone."""
    clacks, thrown = knocks()
    shoves = thuds() + grinding() + judder() + rubs()
    antlers = brush(clacks + snaps() + shoves)
    echo = forest(thrown + undb(shove_echo_db) * shoves)
    return antlers + echo + sleeve() + drags() + ticks() + meadow()


def record(dry):
    """Steep elliptic low-pass: the recorder cuts the top."""
    return signal.sosfilt(signal.ellip(8, .2, 70, TOP_HZ, fs=SR, output="sos"), dry)


dry = scene()
out = record(dry)
generate_wav(out)
```